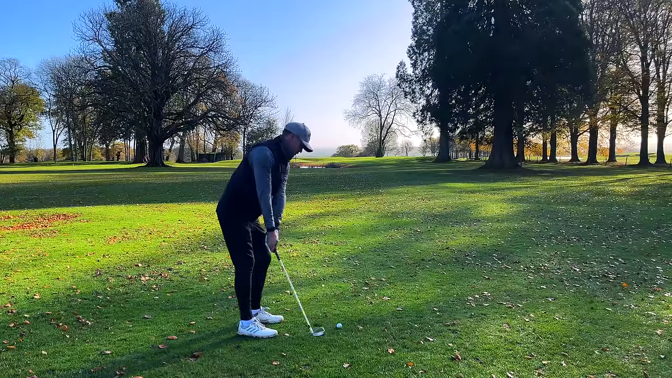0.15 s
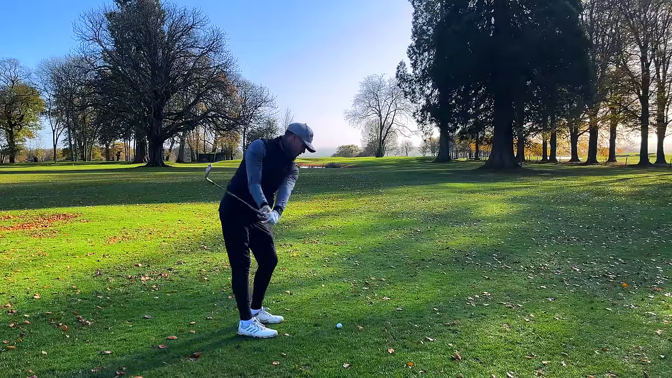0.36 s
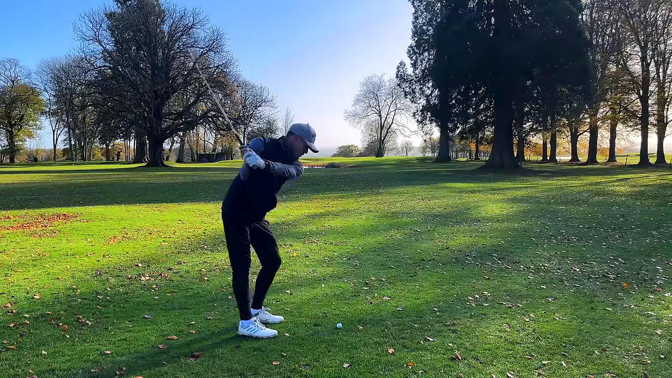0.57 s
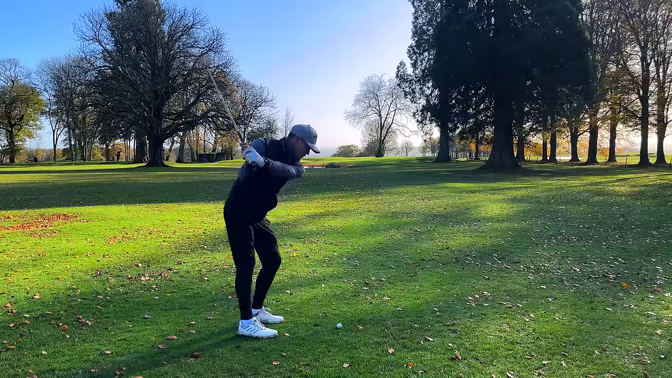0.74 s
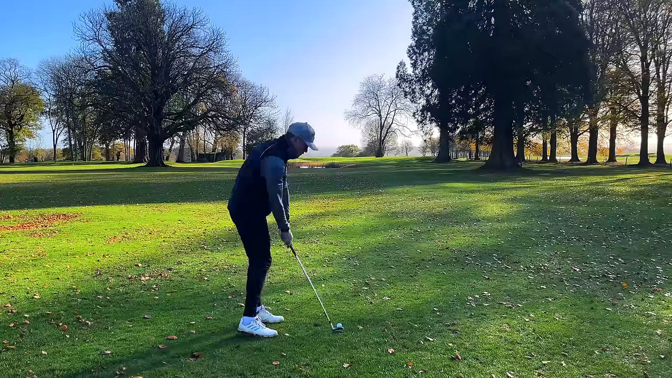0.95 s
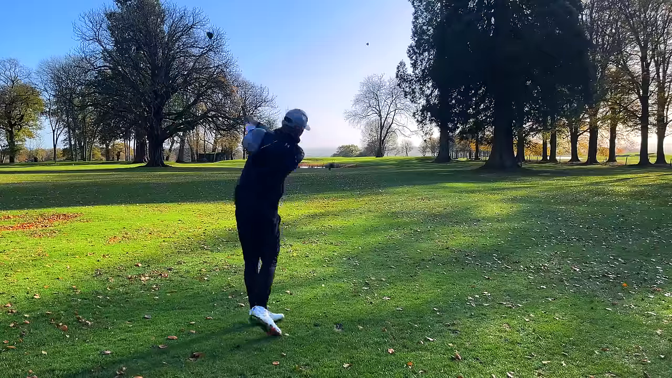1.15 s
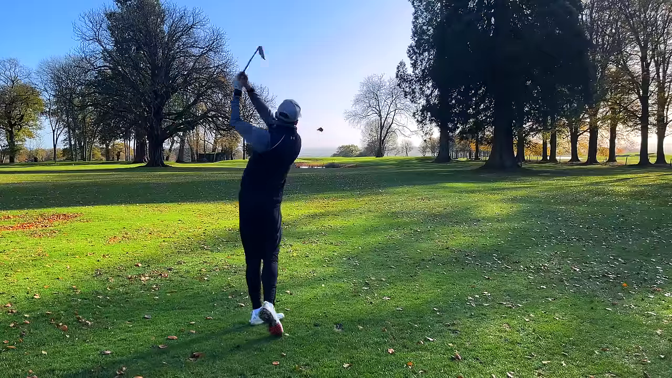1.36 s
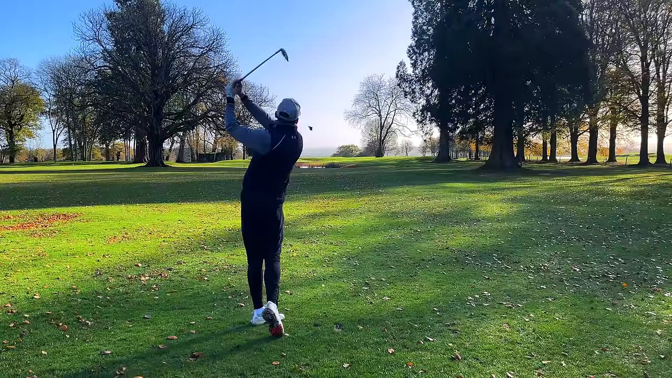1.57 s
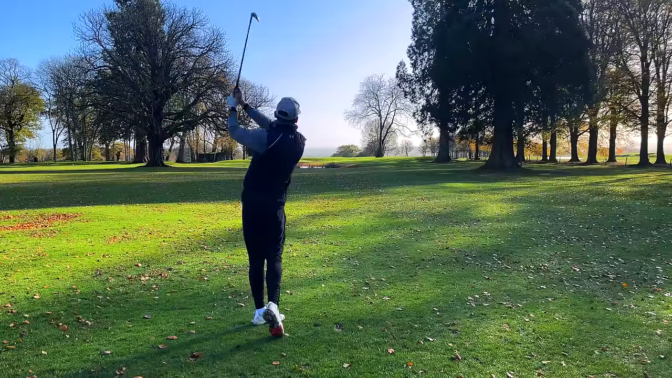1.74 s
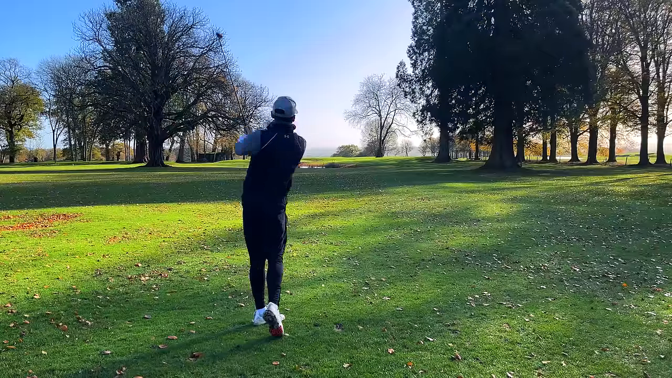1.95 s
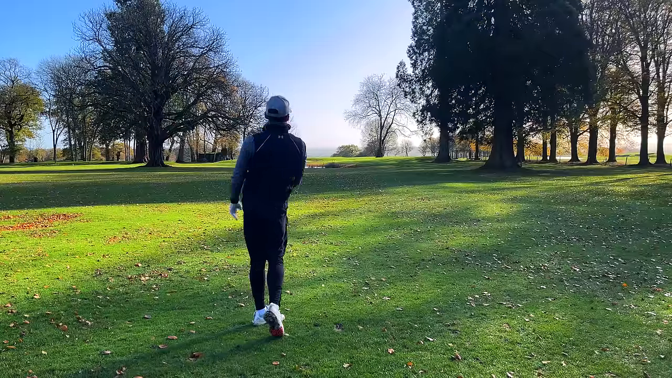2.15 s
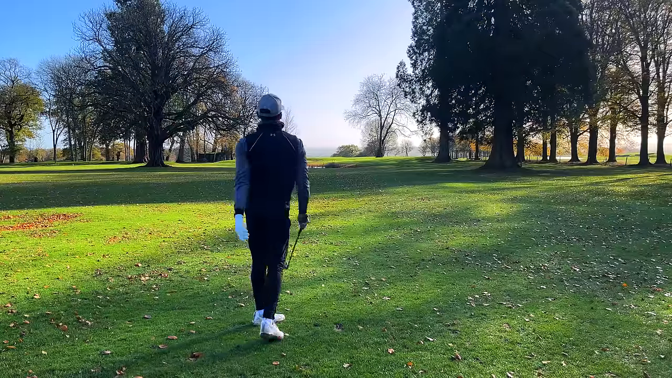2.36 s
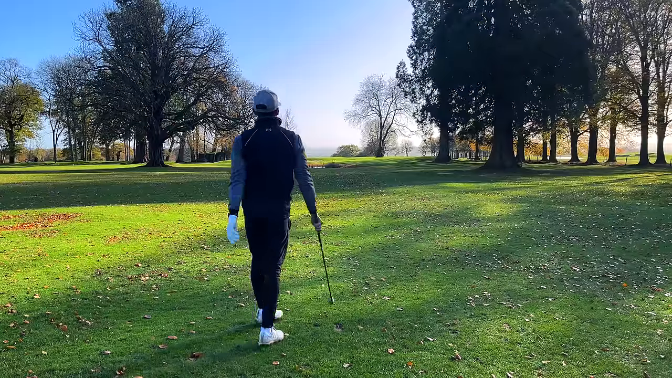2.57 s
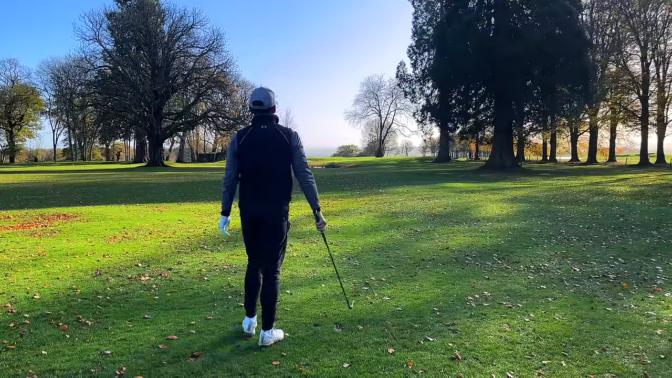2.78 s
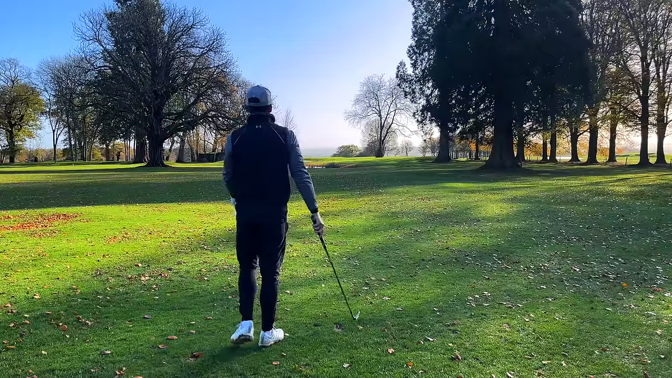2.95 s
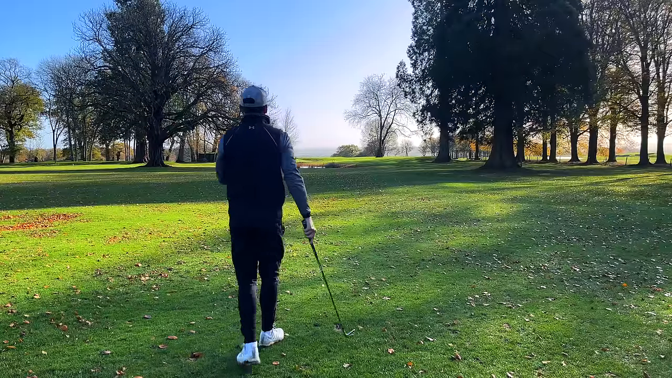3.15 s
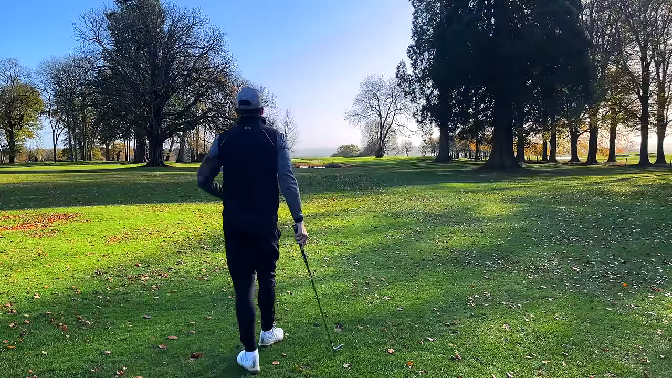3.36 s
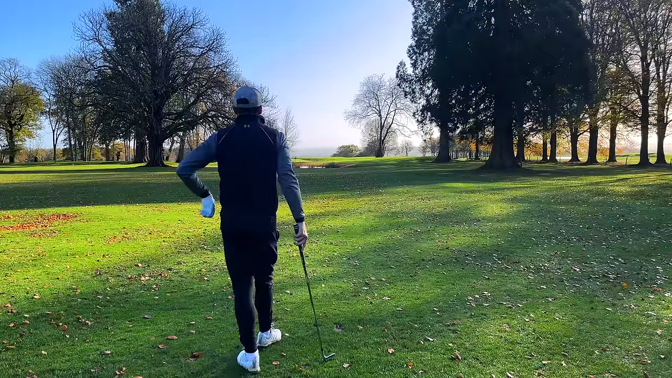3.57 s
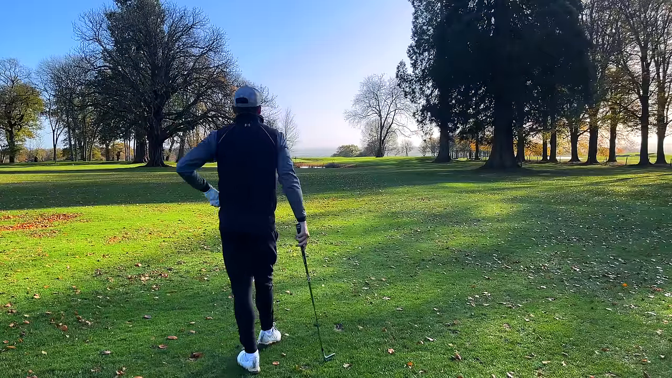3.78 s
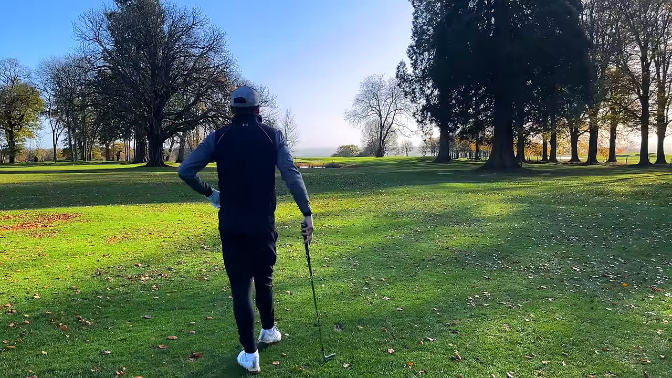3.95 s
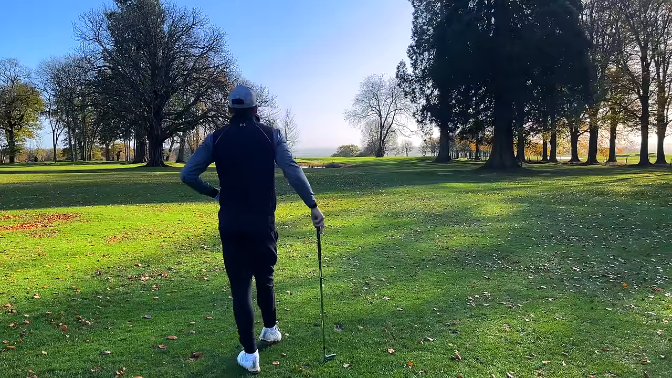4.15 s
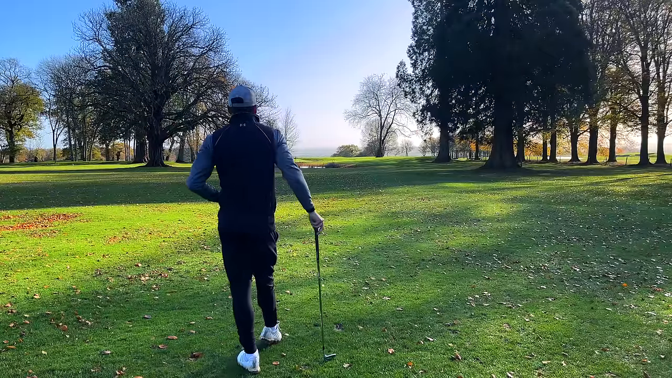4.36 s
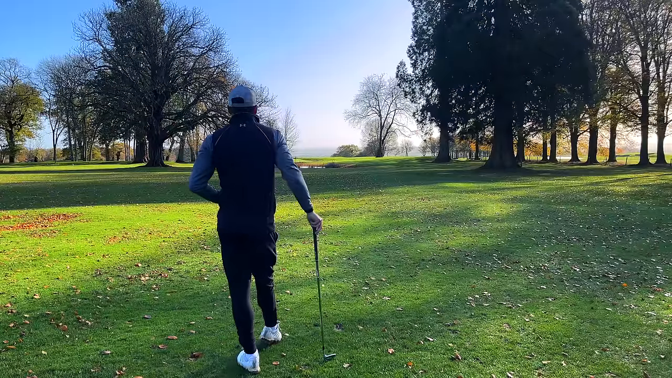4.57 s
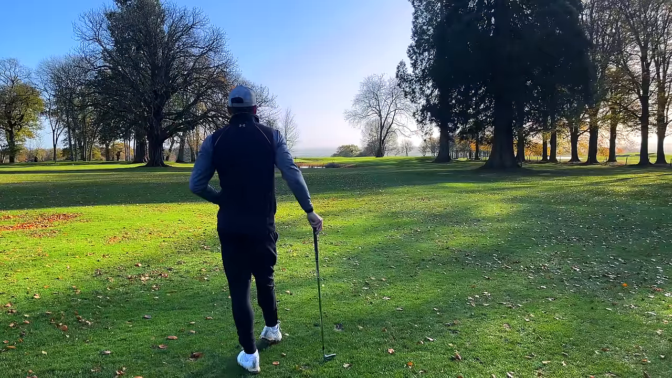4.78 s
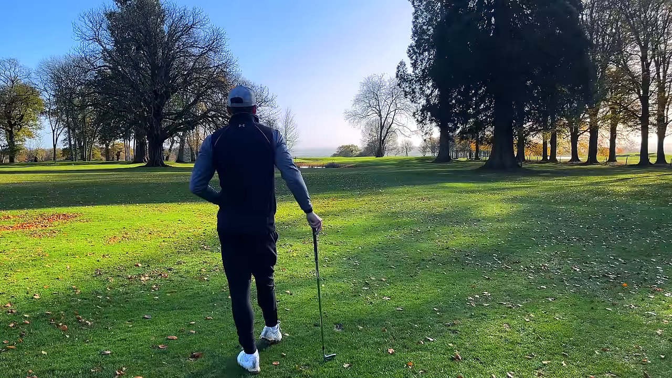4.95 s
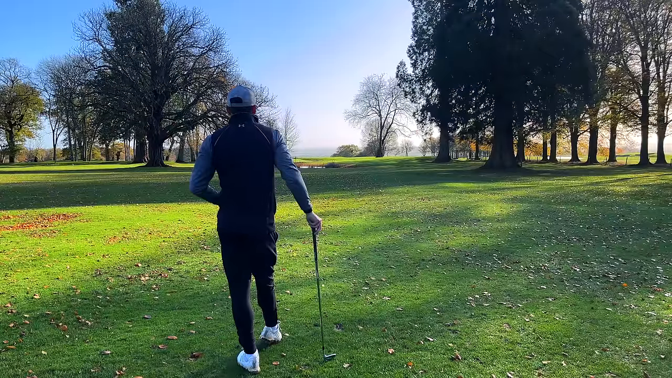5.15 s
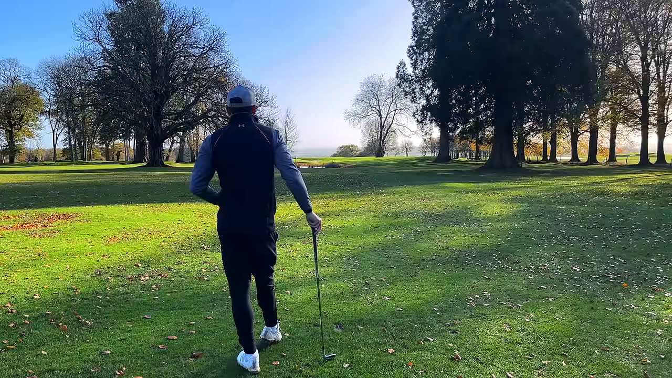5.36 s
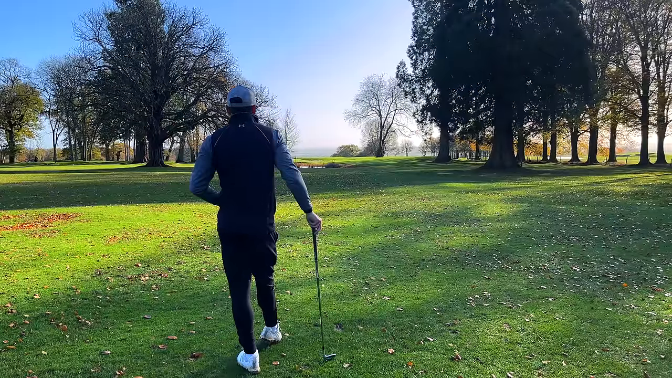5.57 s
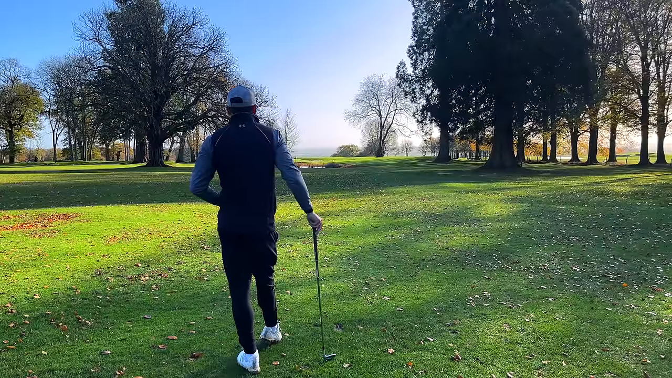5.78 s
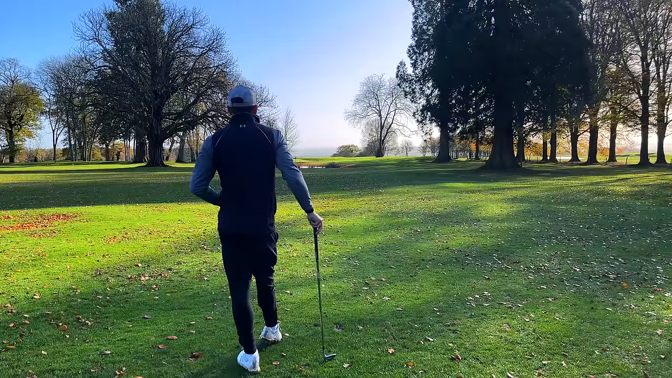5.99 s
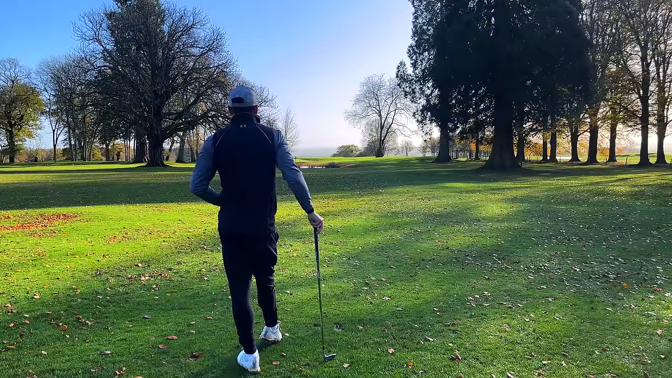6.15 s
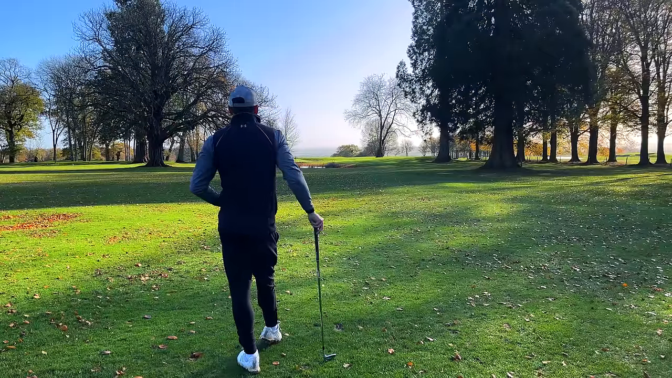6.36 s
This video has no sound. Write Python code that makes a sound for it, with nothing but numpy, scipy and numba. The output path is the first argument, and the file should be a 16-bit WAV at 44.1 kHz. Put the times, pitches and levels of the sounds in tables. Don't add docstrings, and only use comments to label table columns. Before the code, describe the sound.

An open fairway heard through a phone microphone: low, gusty wind rumble, soft airy hiss, a very faint far mower hum near 90 Hz and distant tyre drone. Small birds give short, quiet whistles and pips throughout. From 0 to 0.8 s clothes and grass rustle a few metres away. At about 0.88 s a fast swish rises in pitch, and at 0.96 s the iron hits: one very loud, dry, hard click, a woody knock with bright steel edge and a short rip of turf, gone within hundredths of a second. The background drops suddenly, then creeps back by roughly 2 s. Light ticks and cloth rustles follow from 1.1 to 2.3 s, with soft shoe and fabric movements near 3.1, 3.5 and 4.1 s. At 5.5 s a tiny tick and soft clod thud sound; wind swells around 6.1 s, before the end at 6.4 s.

```python
import sys
import numpy as np
from scipy import signal
from scipy.fft import rfft, irfft
from scipy.io import wavfile
from scipy.ndimage import uniform_filter1d
from numba import njit

SR = 44100
rng = np.random.default_rng(int(sys.argv[2]) if len(sys.argv) > 2 else 0)


def gain_from_decibels(decibels):
    exponent = np.asarray(decibels, float) / 20
    return 10 ** exponent


def dump_mix(stems):
    frames = np.atleast_2d(stems).T
    limited = np.clip(frames, -1, 1)
    pcm = np.round(limited * 32767).astype(np.int16)
    wavfile.write(sys.argv[1], SR, pcm)


N = 283062
T = np.arange(N) / SR
BLOW_S = .9573
ROAD_MEAN_DB = -57


def curves(table):
    s, *columns = np.transpose(table)
    return [np.interp(T, s, c) for c in columns]


@njit
def svf(x, hz, width):
    y, b, l = np.empty(len(x)), 0., 0.
    for i in range(len(x)):
        g, k = np.tan(np.pi * hz[i] / SR), width / hz[i]
        v = (b + g * (x[i] - l)) / (1 + g * (g + k))
        b, l, y[i] = 2 * v - b, l + 2 * g * v, k * v
    return y


def unit(x):
    return x / np.sqrt(np.mean(x ** 2))


def hiss(lo_hz, hi_hz):
    sos = signal.butter(2, [lo_hz, hi_hz], "bandpass", fs=SR, output="sos")
    return unit(signal.sosfilt(sos, rng.standard_normal(N)))


def walk(rate):
    hold = int(SR / rate)
    steps = np.repeat(rng.standard_normal(N // hold + 1), hold)
    return unit(uniform_filter1d(uniform_filter1d(steps, hold), hold)[:N])


def ring(s, modes):
    age = np.clip(T - s, 0, 1)
    live = slice(int(s * SR), int(s * SR) + 4000)
    out = np.zeros(N)
    for hz, db, t60 in modes:
        out[live] += gain_from_decibels(db - 60 * age[live] / t60) * np.sin(2 * np.pi * hz * age[live])
    return out * np.clip(age / .00045, 0, 1)


def duck(depth_db, fall_s, back_s):
    since = T - BLOW_S
    return -depth_db * np.clip(since / fall_s, 0, 1) * np.exp(-np.clip(since - fall_s, 0, 9) / back_s)


def capsule():
    since = T - BLOW_S
    drop_db = 9.3 * (since > 0) * np.exp(-np.clip(since, 0, 9) / 0.55)
    return hiss(9400, 13500) * gain_from_decibels(-57.5 - drop_db)


# (time [s], level [dB])
CARS = [(0, -64), (.9, -58), (1.8, -61.5), (2.3, -51.5), (2.9, -55), (3.3, -57), (3.6, -49), (3.9, -58.5),
        (4.3, -50), (4.7, -57), (5.0, -59), (5.4, -54), (5.7, -62), (6.42, -74)]


def road():
    db = curves(CARS)[0]
    hz = 752 + 3.5 * (db - ROAD_MEAN_DB)
    drone = unit(svf(svf(rng.standard_normal(N), hz, 180.0), hz, 180.0))
    return drone * gain_from_decibels(db + duck(*GAIN_DUCKS[1]) + 1.6 * walk(25))


# (frequency [Hz], level [dB per Hz])
WIND = [(20, -26), (49, -2), (70, 2), (100, -7), (125, -13), (170, -19.5), (210, -28.5)]
AIR_COLOUR = WIND + [(420, -31), (750, -36), (1300, -42.0), (2200, -47.5), (4500, -51), (9000, -53.5),
              (12000, -59.0)]
LAYER_CENTRES = [110, 550, 2000, 7000]
# (time [s], level [dB])
GUSTS = [(0, 1.5), (.1, -5.5), (.25, 2.5), (.37, -11.5), (.46, -1), (.9, 2), (1.5, 2.5), (1.75, -2.5),
         (2.3, -2.5), (3.0, -1), (3.4, 1), (3.95, 3), (4.45, -1), (5.2, -2), (5.5, 1), (5.9, 0.5),
         (6.1, 5.5), (6.42, 2.5)]
# (time [s], level [dB])
STIRRING = [(0, 3), (.1, 0), (.27, 6), (.42, 7.5), (.6, 3.5), (.76, 1.5), (.86, 5.5), (1.25, 7.5), (1.6, 5),
            (1.75, 5), (2.35, 7), (2.6, 2), (3.1, 2.5), (3.7, 0.5), (4.5, 1), (5.2, 0), (5.9, 0),
            (6.42, -2)]
# (depth [dB], fall [s], recovery [s])
GAIN_DUCKS = [
    (24.6, 0.14, 0.21),
    (18, 0.046, 0.33),
    (9.3, 0.11, 0.16),
    (13.1, 0.037, 0.64),
]


def air():
    gust, stir = curves(GUSTS)[0], curves(STIRRING)[0]
    cars = curves(CARS)[0] - ROAD_MEAN_DB
    layers = [gust, .14 * (cars + stir), .8 * stir, 1.17 * stir]  # wind, traffic, grass, cloth [dB]
    swell = [db + duck(*row) for db, row in zip(layers, GAIN_DUCKS)]
    noise, bins = rng.standard_normal(N), np.fft.rfftfreq(N, 1 / SR) + 1
    grain_db = np.minimum(4. * rng.exponential(size=N), 9)
    crackle = (rng.random(N) < .02) * rng.standard_normal(N) * gain_from_decibels(grain_db)
    colour_hz, colour_db = np.transpose(AIR_COLOUR)
    colour = gain_from_decibels(np.interp(np.log(bins), np.log(colour_hz), colour_db))
    share = np.clip(0.25 * np.log2(bins / 700), 0, .5)
    whole = colour * (rfft(noise) + share * rfft(unit(crackle)))
    out = 0
    for hz in 25 * 2 ** (np.arange(20) / 2):
        band = irfft(whole * np.clip(1 - abs(2 * np.log2(bins / hz)), 0, 1), N)
        place = np.interp(np.log(hz), np.log(LAYER_CENTRES), range(4))
        db = sum(max(1 - abs(place - k), 0) * row for k, row in enumerate(swell))
        steep = 1.3 if hz > 9000 else 1
        out = out + band * gain_from_decibels(db * steep + 1.28 * walk(9))
    return out * gain_from_decibels(-1.0)


# (time [s], level [dB])
MOWER_LEVEL = [(0, -32), (.9, -34.5), (1.9, -34), (2.6, -27.5), (3.3, -24.5), (3.8, -31.5), (4.3, -28),
               (4.9, -24), (5.2, -31.5), (5.55, -26.5), (5.77, -33.5), (6.0, -25.5), (6.2, -31),
               (6.42, -37)]
# (middle [s], half length [s], level [dB])
ENGINE_STRAIN = [
    (.4, 0.41, -55.5),
    (3.418, 0.59, -49.5),
    (5.203, 0.25, -58.5),
    (5.667, 0.059, -43),
    (5.86, 0.048, -46.5),
    (6.194, .1, -61),
]


def mower():
    firing_hz = 88.63 * (1 + 0.00412 * walk(4.994))
    phase = 2 * np.pi * np.cumsum(firing_hz) / SR
    first = gain_from_decibels(curves(MOWER_LEVEL)[0] + 0.93 * walk(6.8)) * np.sin(phase)
    third = gain_from_decibels(-65.5)
    for s, half, db in ENGINE_STRAIN:
        third = third + gain_from_decibels(db) * np.exp(-((T - s) / half) ** 2)
    lines = first + third * gain_from_decibels(2.5 * walk(12)) * np.sin(3 * phase)
    return np.sqrt(2) * gain_from_decibels(duck(depth_db=22, fall_s=0.09, back_s=0.46)) * lines


# (time from its start [s], pitch [Hz], level [dB])
CALL_SHAPE = [
    (-.004, 4500, -14),
    (.001, 3400, -3),
    (.007, 2650, -4),
    (.02, 2200, -5),
    (.032, 2300, -12),
    (.045, 2550, -2),
    (.056, 3050, 0),
    (.07, 2400, -3),
    (.078, 2300, -25),
]
# (time [s], level [dB], octave [dB], line at 1.5 times [dB], pitch factor [1])
BIRD_CALLS = [(.05, -51, -4, -7, 1.03), (.35, -53, -10, -6, .95), (.722, -51, -8, -8, .96),
              (1.985, -56, -2, -14, .95), (2.43, -54, -1, -2, .98), (2.82, -50, -16, -16, 1.01),
              (3.245, -57, -8, -2, .93), (3.57, -58, -6, -3, .97), (4.03, -53, -5, -6, .96),
              (4.372, -53, -12, -12, .99), (4.71, -53, -12, -9, .93), (5.298, -50, -4, -6, .92),
              (5.716, -50, -9, -14, 1.0), (6.125, -58, -10, -3, .92)]
# (time [s], length [s], from [Hz], to [Hz], level [dB])
BIRD_PIPS = [(.062, .014, 2850, 2700, -53), (.404, .014, 3150, 3000, -51), (1.638, .014, 3350, 3200, -54),
             (1.799, .013, 3300, 3200, -52), (2.462, .028, 4400, 3500, -53), (2.997, .014, 3050, 2950, -50),
             (.748, .02, 2600, 2900, -53), (3.953, .02, 2700, 3050, -55), (4.068, .028, 3850, 3700, -58),
             (4.61, .016, 3150, 2900, -52), (5.008, .018, 3200, 2600, -55), (5.33, .012, 3150, 3050, -53),
             (5.735, .03, 4350, 4250, -57), (5.775, .013, 2800, 3100, -53)]


def birds():
    out, (age, hz, db) = np.zeros(N), np.transpose(CALL_SHAPE)
    waver = 1 + .014 * walk(300)
    for s, level_db, octave_db, half_db, factor in BIRD_CALLS:
        phase = 2 * np.pi * np.cumsum(factor * waver * np.interp(T - s, age, hz)) / SR
        tone = np.sin(phase) + gain_from_decibels(octave_db) * np.sin(2 * phase) + gain_from_decibels(half_db) * np.sin(3 * phase / 2)
        out += tone * gain_from_decibels(level_db + np.interp(T - s, age, db, -99, -99))
    for s, length, from_hz, to_hz, level_db in BIRD_PIPS:
        part = np.clip((T - s) / length, 0, 1)
        phase = 2 * np.pi * np.cumsum(from_hz + part * (to_hz - from_hz)) / SR
        out += gain_from_decibels(level_db) * np.sin(np.pi * part) * np.sin(phase)
    out = out * gain_from_decibels(1 + 2.2 * walk(150))
    trees = rng.standard_normal(4000) * gain_from_decibels(-26 - 60 * T[:4000] / .11)
    return out + signal.fftconvolve(out, trees)[:N]


# (time [s], length [s], from
# [Hz], to [Hz], level [dB])
RUSTLE_EVENTS = [(0.27, 0.19, 149, 260, -49), (1.184, 0.3, 800, 3350, -52), (1.29, .06, 600, 1300, -51),
                 (3.598, 0.4, 250, 480, -52), (1.607, 0.047, 500, 6980, -46.5),
                 (1.609, 0.044, 500, 1100, -45.5), (0.967, 0.042, 1000, 4000, -54),
                 (1.878, .06, 4000, 13000, -48), (1.892, 0.074, 195, 273, -46), (2.04, 0.13, 148, 296, -44),
                 (2.16, 0.19, 302, 420, -50), (2.27, 0.13, 1000, 11000, -50),
                 (3.068, 0.067, 3500, 11900, -44), (3.062, 0.075, 250, 2500, -48),
                 (3.107, 0.13, 800, 3000, -52), (3.135, 0.1, 4000, 10000, -53.5),
                 (3.457, 0.17, 6000, 12000, -48), (3.51, 0.11, 3000, 9000, -49.5),
                 (3.511, 0.12, 500, 3020, -51.5), (4.052, 0.047, 1200, 7900, -50.5),
                 (4.366, 0.13, 2500, 10000, -52), (4.1, 1, 358, 448, -51), (4.734, 0.064, 1199, 4970, -54),
                 (5.84, 0.29, 119, 188, -41.5)]


def rustles():
    out = 0
    for s, length, lo_hz, hi_hz, db in RUSTLE_EVENTS:
        part = np.clip((T - s) / length, 0, 1)
        out = out + gain_from_decibels(db) * np.sin(np.pi * part ** 0.73) * hiss(lo_hz, hi_hz)
    return out * gain_from_decibels(1.0 * walk(60) + 3 * walk(500))


# (frequency [Hz], level [dB], t60 [s])
CLOD_MODES = [(240, -27, .06), (380, -30, .04), (560, -33, .03)]
# (time [s], peak level [dB], centre [Hz])
TICK_EVENTS = [(1.078, -46, 6130), (1.1094, -44, 11500), (1.3622, -33, 5600), (1.5314, -34, 6000),
               (1.6654, -36, 5730), (1.903, -32, 8100), (1.924, -33, 7250), (1.985, -39, 5080),
               (3.2499, -34.5, 3610), (5.262, -39, 5980), (5.4779, -32, 7330)]


def ticks():
    noise, out = hiss(2700, 9600), ring(5.477, CLOD_MODES)
    for s, db, hz in TICK_EVENTS:
        crack = noise * (T >= s) * gain_from_decibels(db - 5 - 60 * np.clip(T - s, 0, 1) / .008)
        out = out + crack + ring(s, [(hz, db - 5, .008)])
    return out


# (time [s], shaft whistle [Hz], whoosh level [dB])
DOWNSWING = [
    (.84, 500, -60),
    (.885, 600, -42),
    (.91, 850, -32.5),
    (.935, 1190, -28),
    (.958, 900, -32),
    (.97, 1190, -42),
    (.98, 1500, -72),
]


def swing():
    hz, whoosh_db = curves(DOWNSWING)
    sleeve_db = -37.5 + 0.92 * (whoosh_db - whoosh_db.max())
    tear_s, attack_s, hold_s, t60_s = .9562, .003, .004, 0.023
    since = T - tear_s - attack_s
    fade = gain_from_decibels(-60 * np.clip(since - hold_s, 0, 1) / t60_s)
    tear = np.clip(1 + since / attack_s, 0, 1) ** 2 * fade
    whistle = unit(svf(rng.standard_normal(N), hz, 500.0))
    eddies = whistle + .5 * hiss(1140, 3800) + 1.04 * hiss(280, 820)
    turf = hiss(4100, 11400) + 1.1 * hiss(2000, 14000)
    low = gain_from_decibels(whoosh_db) + tear * gain_from_decibels(-17.5)
    high = gain_from_decibels(sleeve_db) + tear * gain_from_decibels(-20)
    return unit(eddies) * low + unit(turf) * high * gain_from_decibels(0.86 * walk(400))


# (time [s], knock level [dB], ring level [dB])
IMPACTS = [
    (.9573, -9.5, -8.5),
    (.9588, -30, -4),
    (.9600, -9.5, -23),
    (.9612, 1, -7),
    (.9638, -10, -12.5),
    (.9660, -16, -18),
    (.9682, -26, -25),
    (.9700, -30, -38),
]
# (frequency [Hz], level [dB], t60 [s])
KNOCK_MODES = [(393, -11, 0.015), (478, -10, 0.028), (802, 0, 0.017), (1040, -20, 0.0081),
               (1500, -2.5, 0.012), (1710, 4.5, 0.0089), (2327, -2.5, 0.012), (2500, -1.5, 0.0081),
               (2770, -6, 0.0059), (3440, 0, 0.0078)]
# (frequency [Hz], level [dB], t60 [s])
FACE_MODES = [(5460, -4, 0.0074), (6920, 0, 0.0079), (7630, 1, 0.0053), (8630, 2.5, 0.0068),
              (10800, 0, 0.0044), (12500, -6, 0.0075), (15000, -2, .004)]


def strike():
    build_s = .005
    out = .17 * (T < BLOW_S) * np.exp(np.clip(T - BLOW_S, -1, 0) / build_s)
    for k, (s, knock_db, ring_db) in enumerate(IMPACTS):
        knock = gain_from_decibels(knock_db - 7.5) * ring(s, KNOCK_MODES)
        face = gain_from_decibels(ring_db - 3.0) * ring(s, FACE_MODES)
        out = out + (-1) ** (k + 1) * (knock + face)
    return out


def scene():
    background = capsule() + road() + air() + mower() + birds()
    golfer = rustles() + ticks() + swing() + strike()
    return (background + golfer)[None]


def port(x):
    bins = np.fft.rfftfreq(N, 1 / SR)
    port_db = np.interp(bins, [8430, 10060, 13000, 15400, 16000], [0.5, -9, -14.0, -19, -45])
    return irfft(rfft(np.tanh(x)) * gain_from_decibels(port_db), N)


# (frequency [Hz], width [Hz], share removed [0-1])
BAND_EDGES = [(191.6, 29, 0.77), (291.4, 37, 0.73), (509, 126, 0.72), (926, 62, 0.78)]


def crossover_dips(x):
    for hz, width, share in BAND_EDGES:
        x = x - share * svf(x, np.full(N, 1. * hz), 1. * width)
    return x


def top_cut(x):
    return signal.sosfilt(signal.butter(12, 16060, fs=SR, output="sos"), x)


def record(dry):
    mix = crossover_dips(port(dry[0]))
    return top_cut(mix[None])


dry = scene()
out = record(dry)
dump_mix(out)
```